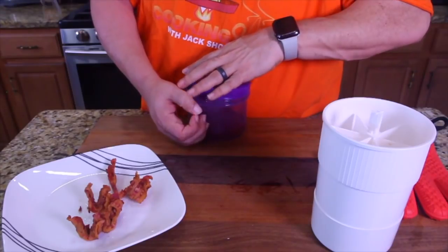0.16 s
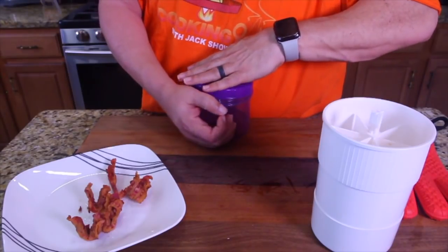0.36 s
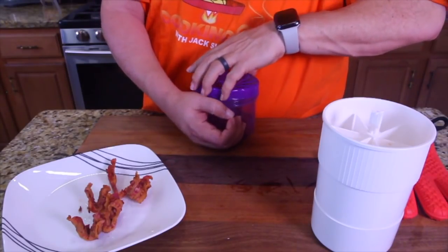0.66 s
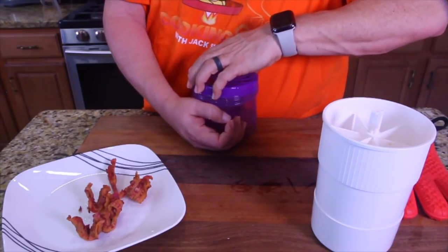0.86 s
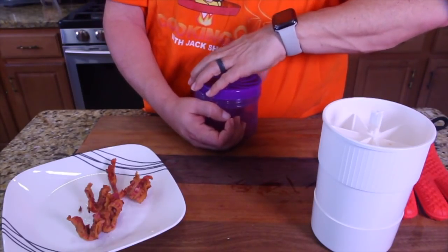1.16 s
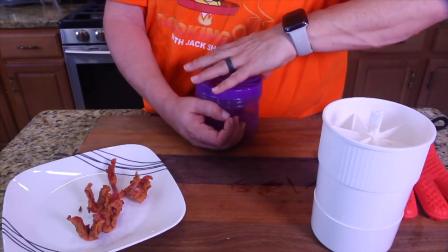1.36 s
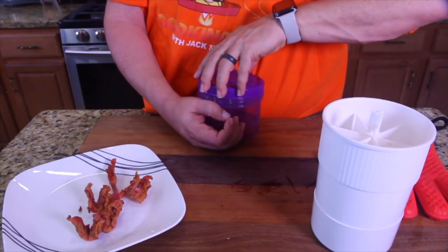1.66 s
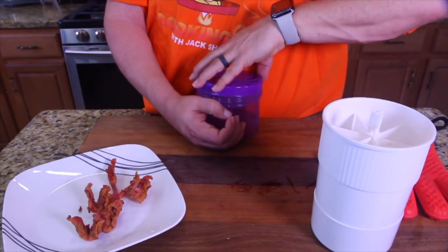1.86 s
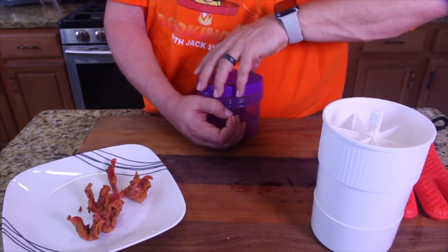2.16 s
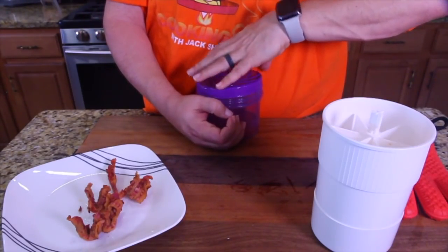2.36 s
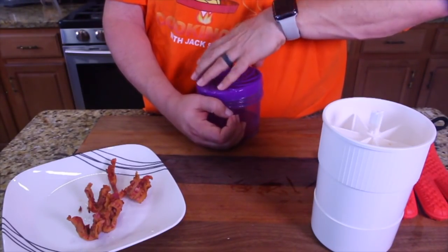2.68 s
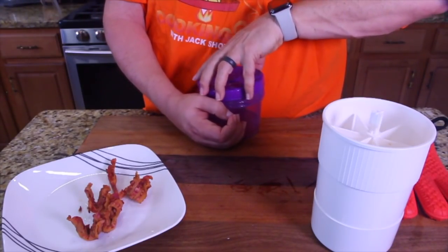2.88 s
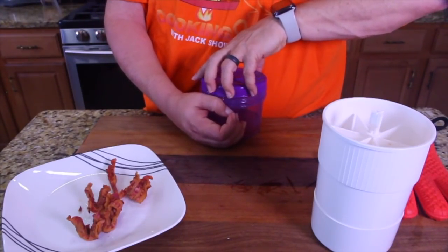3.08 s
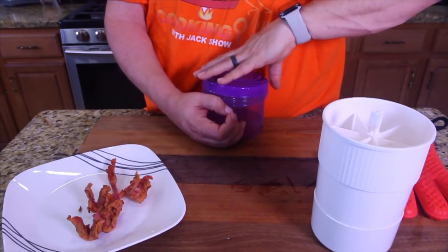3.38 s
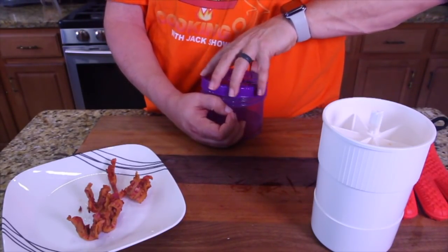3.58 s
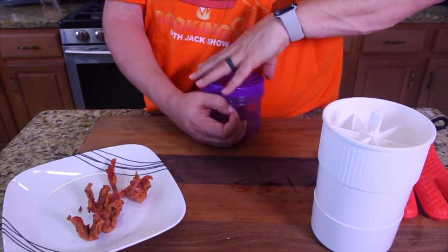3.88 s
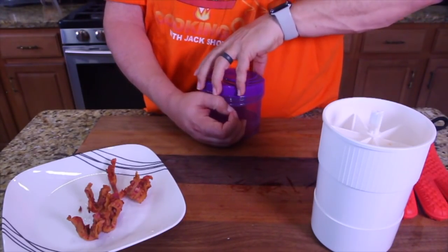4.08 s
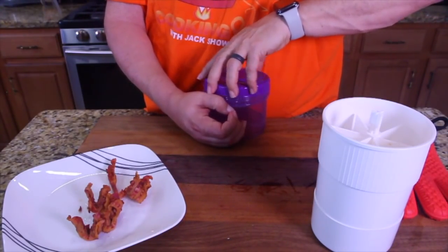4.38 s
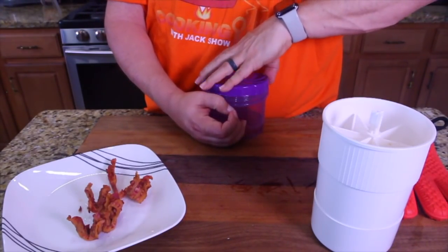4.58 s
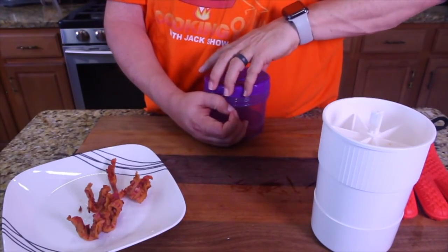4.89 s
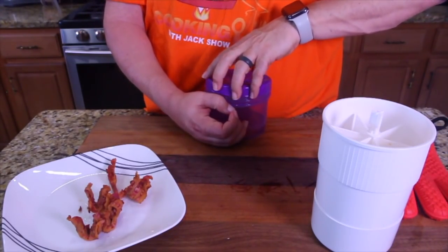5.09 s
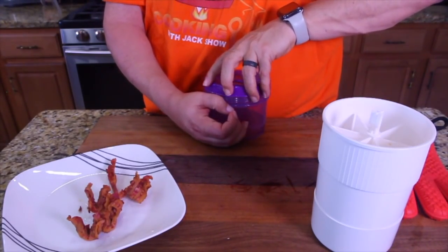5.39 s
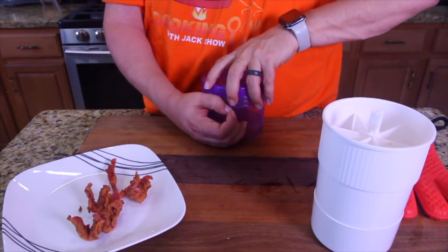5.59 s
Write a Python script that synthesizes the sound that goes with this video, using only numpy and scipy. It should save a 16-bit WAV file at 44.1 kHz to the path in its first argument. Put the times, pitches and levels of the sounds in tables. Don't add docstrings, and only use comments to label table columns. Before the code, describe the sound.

A plastic screw lid is twisted on a small jar over a wooden board, with irregular clicks, hollow knocks, short scrapes and one faint squeak.

```python
import sys
import numpy as np
from scipy import signal
from scipy.fft import rfft, irfft, next_fast_len
from scipy.io import wavfile
from scipy.ndimage import uniform_filter1d

SR = 44100
rng = np.random.default_rng(int(sys.argv[2]) if len(sys.argv) > 2 else 0)


def voltage_ratio(decibels):
    exponent = np.asarray(decibels, float) / 20
    return 10 ** exponent


def unload_wav(signal):
    wavfile.write(
        sys.argv[1],
        SR,
        np.round(np.clip(np.atleast_2d(signal).T, -1, 1) * 32767).astype(np.int16),
    )


N = 253134
ROOM_TO_SPARE = 32768

# frequency in Hz, width in Hz, level in dB.
BOARD = [(137.7, 10.8, 0.5), (194.5, 4.1, 7), (233.6, 7.1, 4), (285.1, 14.2, 2.5), (336.4, 16.7, 1.5),
         (381, 65, -6.5), (508, 33, 6)]
# frequency in Hz, width in Hz, level in dB.
JAR = [(526, 280, -0.5), (741, 118, 6), (774, 44, 5), (960, 133, 3), (1060, 143, 2), (1200, 54, -1),
       (1263, 19, 1), (1630, 99, -4), (1988, 51, -7.5), (2190, 260, -14.5), (2680, 30, -27),
       (3440, 40, -33)]
# start in seconds, time held in seconds, scrape in dB,
# weight on the board in dB over the scrape, skin hiss in dB over the scrape.
TWISTS = [(0.0, 0.022, -43.5, -2, -9.5), (0.202, 0.018, -56, -20, -5), (0.335, 0.03, -51, -12, -4),
          (0.5, 0.12, -58.5, -2, -3), (0.72, 0.19, -62.5, -4, 1), (0.95, 0.0098, -44, -2, -6),
          (1.1, 0.056, -47.5, 6, -3.5), (1.66, 0.043, -49.5, 1.5, -9), (1.82, 0.18, -60.5, 7, -1.5),
          (2.04, 0.027, -78, 5, 3), (2.27, 0.057, -48, -3.5, -10), (2.58, 0.034, -50.5, -0.5, -8.5),
          (2.7, 0.13, -52.5, 2, -4), (3.02, 0.026, -47, 1, -12.5), (3.19, 0.049, -46.5, 3, -9),
          (3.58, 0.088, -73.5, -9, 11.5), (3.66, 0.11, -49.5, 2, -7), (4.2, 0.1, -55, 1.5, -7),
          (4.463, 0.094, -47, -5, -3.5), (4.86, 0.051, -51.5, -8, -11), (5.02, 0.097, -51.5, -5.5, -8.5),
          (5.19, 0.046, -61, 0.5, -8.5), (5.545, 0.02, -63, 5, 1), (5.61, 0.016, -61, -10, -16),
          (5.72, 0.027, -72, 10, 8)]


def unit(x):
    return x / np.sqrt(np.mean(x ** 2) + 1e-20)


def peak(x):
    return x / np.abs(x).max()


def along(points, hz):
    f, v = np.transpose(points)
    return np.interp(np.log(hz + 1), np.log(f + 1), v)


def shade(points):
    return lambda hz: voltage_ratio(along(points, hz))


def filtered(x, response):
    m = next_fast_len(len(x) + 4096)
    spectrum = rfft(x, m) * response(np.fft.rfftfreq(m, 1 / SR))
    return irfft(spectrum, m)[:len(x)]


def lowpass(hz, corner_hz):
    return 1 / (1 + 1j * hz / corner_hz) ** 2


def resonances(modes, hz, change_db=0):
    centre, width, db = np.transpose(modes)[:, :, None]
    sign = (-1.) ** np.arange(len(modes))[:, None]
    gain = voltage_ratio(db + np.reshape(change_db, (-1, 1))) * sign
    return np.sum(gain * 1j * hz * width / (centre * centre - hz * hz + 1j * hz * width), axis=0)


def taps(t, spread_s, count, chatter=1):
    x = np.zeros(len(t))
    when, size = rng.random((2, count))
    x[(spread_s * when * SR).astype(int) + 1] = chatter * (1.87 * size - .3)
    x[0] = 1
    return x


def played(events, sound):
    out = np.zeros(N + ROOM_TO_SPARE)
    for s, *values in events:
        dry, sent = sound(*values)
        wet = echo(sent, gap_s=0.0079)
        out[round(s * SR):][:len(dry)] += dry
        out[round(s * SR):][:len(wet)] += wet
    return out[:N]


def contacts():
    # start in seconds, knock in dB, knock centre in Hz,
    # air in the jar in dB, board in dB.
    hard_knocks = [(0.918, -42, 1080, -34, -60), (0.935, -26, 840, -31, -64), (1.071, -47, 900, -30.5, -33),
                   (1.155, -35, 1090, -29.5, -24), (1.715, -30.5, 1120, -33, -35),
                   (1.962, -31, 690, -41, -32), (2.283, -31.5, 1520, -38, -31),
                   (2.299, -29.5, 590, -34, -28), (2.677, -49, 980, -57, -56),
                   (2.683, -27.5, 2020, -25, -37), (3.037, -40, 810, -53, -46),
                   (3.214, -21.5, 676, -31, -36), (3.717, -32.5, 667, -37, -45),
                   (3.791, -34, 695, -34, -33.5), (4.054, -38, 737, -51.5, -45.5),
                   (4.181, -40.5, 1200, -37, -35), (4.451, -31, 660, -28, -31),
                   (4.454, -30.5, 1010, -30.5, -58), (4.461, -20.5, 1210, -32, -43),
                   (4.773, -26.5, 946, -21.5, -24), (4.968, -34, 1100, -29, -67),
                   (4.997, -30.5, 1040, -34, -41), (5.002, -43, 1200, -40, -72),
                   (5.735, -36, 655, -61, -42)]
    # start in seconds, lid in dB, air in the jar in dB, board in dB.
    finger_landings = [(0.002, -38, -28.5, -31.5), (0.546, -44.5, -35.5, -34), (0.721, -73, -45.5, -43),
                       (1.059, -51, -37, -37.5), (1.116, -56, -57, -31.5), (1.219, -56, -46, -43),
                       (1.585, -59, -46, -38), (1.648, -35, -31, -35), (1.719, -63, -62, -31),
                       (2.179, -56, -41, -31), (2.203, -53, -38, -52), (2.231, -61, -36, -44),
                       (2.506, -54, -37.5, -37.5), (2.822, -58, -52, -41), (2.911, -62, -51, -44),
                       (3.141, -43, -36.5, -52), (3.288, -40.5, -26, -25), (3.66, -50, -45, -65),
                       (3.899, -73, -51, -55), (4.162, -54, -47, -44), (4.237, -50, -36.5, -64),
                       (4.409, -59, -46.5, -43), (5.143, -63, -44, -43.5), (5.414, -61, -50.5, -46.5),
                       (5.565, -53.5, -39.5, -56), (5.715, -48.5, -44.5, -42.5)]
    # start in seconds, knock in dB, knock centre in Hz,
    # air in the jar in dB.
    light_touches = [(0.003, -33.5, 1085, -65), (1.649, -58, 660, -63), (0.149, -40.5, 726, -64),
                     (0.449, -38, 700, -46.5), (0.893, -60, 921, -45), (1.035, -41, 750, -62),
                     (1.101, -37, 1060, -33.5), (1.249, -40, 1050, -43), (1.614, -36, 916, -42),
                     (1.985, -40, 1020, -43), (2.001, -41, 680, -41.5), (2.553, -43, 760, -67),
                     (2.59, -43, 840, -43), (2.986, -43, 1250, -46), (2.998, -42, 955, -61),
                     (3.609, -42, 880, -42.5), (4.953, -40, 826, -37)]
    delay_s = 0.00124
    knocks = [(s, db, hz, db - 21, jar, board) for s, db, hz, jar, board in hard_knocks]
    landings = [(s, lid + 7, 880, lid, jar, board) for s, lid, jar, board in finger_landings]
    touches = [(s, db, hz, db - 29, jar, jar - 2.5) for s, db, hz, jar in light_touches]
    return np.roll(played(knocks + landings + touches, contact), round(delay_s * SR))


def contact(knock_db, knock_hz, lid_db, jar_db, board_db):
    t = np.arange(4096) / SR

    def burst(hz, s):
        return np.sin(2 * np.pi * hz * t) * (t / s) * np.exp(1 - t / s)

    push = -voltage_ratio(jar_db + 4.0) * burst(291.2, 0.0035)
    push -= voltage_ratio(board_db + 3.5) * burst(211.0, 0.0034)
    push -= voltage_ratio(lid_db + 5.5) * burst(481.0, 0.0021)
    ring = voltage_ratio(-5) * filtered(push, lambda hz: resonances(BOARD, hz))
    thump = push + ring + voltage_ratio(board_db - 46) * burst(100, 0.011)

    near_db = -7 * np.log2(np.transpose(JAR)[0] / knock_hz) ** 2

    def wall(hz):
        modes = resonances(JAR, hz, np.maximum(near_db, -14))
        modes = modes + resonances([(knock_hz, 600, -7)], hz) + resonances([(knock_hz, 110, 1.5)], hz)
        return modes * lowpass(hz, 900 + 0.78 * knock_hz)

    knock = voltage_ratio(knock_db - 2.0) * peak(filtered(taps(t, 0.00385, count=2), wall))
    return thump + knock, voltage_ratio(-9) * thump + voltage_ratio(-5) * knock


def clicks():
    # start in seconds, peak in dB, edge accent in Hz,
    # brightness in dB per octave.
    dry_slips = [(0.0024, -42.5, 3990, 6), (0.2925, -70, 3860, -4), (1.0668, -31, 6100, 0),
                 (1.071, -31.5, 4160, 2.5), (1.0768, -30, 6300, 0.5), (1.102, -38, 4380, 7),
                 (1.1566, -28, 3730, -2), (1.249, -37, 3900, -0.5), (1.6492, -44, 3520, 0),
                 (1.7203, -35.5, 3720, -19), (1.9618, -38, 3640, -1), (2.206, -48, 5840, 3),
                 (2.2821, -34, 4200, 0), (2.2998, -31, 4500, 0.5), (3.043, -33, 4050, 0.5),
                 (3.144, -34.5, 4330, 3), (3.2898, -29, 4170, -0.5), (3.789, -38.5, 3920, 0.5),
                 (4.172, -43, 5540, 1), (4.1809, -38.5, 6200, -2), (4.2367, -42.5, 6200, 2.5),
                 (4.456, -15, 5700, 3.5), (4.7742, -30, 4070, 1.5), (4.955, -43, 4130, 0),
                 (4.9686, -41, 3000, -4), (4.977, -35, 4150, 1), (4.9959, -27.5, 3600, -0.5),
                 (5.7354, -43, 3800, 1)]
    # start in seconds, peak in dB, edge accent in Hz,
    # wall accent in Hz, brightness in dB per octave.
    ringing_slips = [(0.918, -29, 4100, 2130, 0), (0.891, -46, 5210, 2300, 1),
                     (0.9366, -29.5, 3970, 2750, 3.5), (1.037, -39, 3700, 2780, -5),
                     (1.1177, -36, 3900, 2570, 6), (1.7156, -31, 6530, 2080, 3),
                     (2.0, -41, 4000, 3320, 0.5), (2.1246, -46, 5640, 2360, 5),
                     (2.507, -46.5, 4200, 2560, 0), (2.5518, -45, 4130, 2440, -6),
                     (2.676, -35, 4650, 2090, -8), (2.6844, -23, 6900, 2300, 3.5),
                     (2.915, -46, 4100, 2350, 1), (2.9968, -41, 3850, 2480, 2.5),
                     (3.609, -47.5, 8300, 2040, 9), (3.717, -32.5, 3900, 2550, 3),
                     (3.926, -51, 5840, 2150, 8), (4.0544, -48.5, 5870, 2070, 1),
                     (5.565, -38.5, 4320, 2190, -1.5)]
    # start in seconds, peak in dB, edge accent in Hz, second accent in Hz,
    # brightness in dB per octave.
    flick = (5.6727, -47, 5820, 7295, 6)
    walls_hz = 2450 + 600 * rng.standard_normal(len(dry_slips))
    slips = [(s, db, hz, wall, 2, tilt) for (s, db, hz, tilt), wall in zip(dry_slips, walls_hz)]
    snaps = [(s, db, hz, wall, 13, tilt) for s, db, hz, wall, tilt in ringing_slips]
    nail = [(*flick[:-1], 22, flick[-1])]
    return played(slips + snaps + nail, click)


def click(db, edge_hz, wall_hz, accent_db, tilt_db):
    # frequency in Hz, level in dB.
    click_colour = [(1200, 9.5), (2300, 3.5), (4000, -2), (5200, -5.5), (6200, -3.5), (9000, -5.5),
                    (11500, -10), (14000, -20.5), (16000, -23.5)]
    t = np.arange(2048) / SR

    def colour(hz):
        return shade(click_colour)(hz) * voltage_ratio(tilt_db * np.log2(np.maximum(hz, 2000) / 5000))

    def edge(hz):
        lid_edge = resonances([(edge_hz, 450, accent_db)], hz)
        wall = resonances([(wall_hz, 300, accent_db - 9.5)], hz)
        return colour(hz) * (1.5 + lid_edge + wall)

    fray = 0.11 * rng.standard_normal(len(t)) * voltage_ratio(-60 * t / 0.043)
    catch = taps(t, 0.0016, count=3, chatter=0.26) + fray
    crack = -voltage_ratio(db + 6.5) * peak(filtered(np.roll(catch, 8), edge))
    pulse = np.roll(taps(t, .003, count=0), 64)
    smooth = filtered(pulse, lambda hz: abs(edge(hz)) ** 0.48 * colour(hz) ** 0.31)
    return crack, voltage_ratio(-2.5) * smooth * np.linalg.norm(crack) / np.linalg.norm(smooth)


def thread():
    # frequency in Hz, level in dB.
    skin = [(1500, -0.5), (2400, -0.5), (3200, -1), (4400, -4), (5100, -5), (5900, -1.5), (7500, -5.5),
            (11000, -14), (16000, -21)]
    scrape_db, weight_db, skin_db = np.transpose(TWISTS)[2:]
    rumble_gain = effort(scrape_db + weight_db, ease_db_per_s=82, rest_db=-68)
    scrape_gain = effort(scrape_db, ease_db_per_s=57.5, rest_db=-89)
    hiss_gain = effort(scrape_db + skin_db, ease_db_per_s=60.5, rest_db=-69)

    wide_jar = np.array(JAR) * np.array([1, 1.6, 1])
    rumble = filtered(grit(70, spread_db=4, smooth=.4), lambda hz: resonances(BOARD[:-1], hz))
    scrape = filtered(grit(250, spread_db=1.5, smooth=0.77), lambda hz: resonances(wide_jar, hz))
    hiss = filtered(grit(700, spread_db=2.0, smooth=2.2), shade(skin))

    rub = voltage_ratio(1.0) * rumble_gain * unit(rumble)
    rub += voltage_ratio(-5.0) * scrape_gain * unit(scrape)
    return rub + voltage_ratio(-3.5) * hiss_gain * unit(hiss)


def effort(layer_db, ease_db_per_s, rest_db):
    start, held = np.transpose(TWISTS)[:2, :, None]
    t = np.arange(0, N + 64, 64) / SR
    setting_in = 179 * np.maximum(start - t, 0)
    easing_off = ease_db_per_s * np.maximum(t - start - held, 0)
    db = layer_db[:, None] - setting_in - easing_off
    gain = np.sqrt(np.sum(voltage_ratio(2 * db), axis=0) + voltage_ratio(2 * rest_db))
    return np.interp(np.arange(N) / SR, t, gain)


def grit(rate, spread_db, smooth):
    draw = rng.random((3, N))
    size = voltage_ratio(-spread_db * np.log(draw[2] + 1 / 20))
    slips = (draw[0] < rate / SR) * np.sign(draw[1] - .5) * size
    return unit(slips) + smooth * rng.standard_normal(N)


def rings():
    # frequency in Hz, level in dB, t60 in seconds.
    bell = [(556, 4, 0.25), (1040, -9, 0.11), (1197, 5, 0.18), (1310, -3, 0.22), (1680, -8, 0.25),
            (1880, -2.5, 0.32), (1980, -5, 0.28), (2643, -1, 0.24), (3140, -3, 0.25), (3530, -22, .22),
            (3840, -16, .26)]
    # start in seconds, level in dB, centre of the ringing in Hz.
    blows = [(0.934, -48, 1920), (1.073, -55, 1910), (1.118, -49, 2300), (1.156, -49, 1500),
             (1.651, -55, 800), (1.716, -51.5, 1900), (2.283, -52, 1500), (2.684, -43.5, 1900),
             (3.215, -50, 1200), (3.717, -58, 1250), (4.183, -52, 1240), (4.458, -42.5, 1690),
             (4.776, -50.5, 1610), (4.999, -45, 1200)]
    out, t = np.zeros(N + ROOM_TO_SPARE), np.arange(8192) / SR
    hz, level, t60 = np.transpose(bell)[:, :, None]
    for s, db, centre_hz in blows:
        flutter = uniform_filter1d(rng.standard_normal((len(bell), len(t))), size=900, axis=1)
        focus_db = -14 * np.log2(hz / centre_hz) ** 2
        gain = voltage_ratio(db + level + focus_db - 60 * t / t60 + 3.9 * unit(flutter))
        phase = 2 * np.pi * (hz * t + rng.random(hz.shape))
        swell = 1 - np.exp(-t / 0.002)
        out[round(s * SR):][:len(t)] += np.sum(gain * np.sin(phase), axis=0) * swell
    return out[:N]


def rocks_and_pings():
    # start in seconds, frequency in Hz, peak in dB, t60 in seconds.
    dull_rocks = [(0.209, 336, -50, 0.24), (0.312, 323, -49, 0.086), (0.78, 317, -46, 0.1),
                  (0.857, 320, -53, 0.095), (0.904, 295, -37, 0.045), (0.944, 285, -31, 0.12),
                  (1.0, 302, -46, 0.073), (1.166, 190, -43, 0.24), (3.295, 194.5, -55, .3),
                  (4.47, 196, -39, .3), (4.301, 303, -45, 0.067), (3.059, 250, -45, .05),
                  (2.944, 250, -47, .05), (1.117, 287, -30, 0.069), (1.6491, 665, -22.5, 0.022),
                  (1.65, 268, -26, .035), (1.668, 487, -34, 0.053), (2.2905, 635, -36, .02),
                  (2.686, 544, -35.5, 0.054), (4.456, 780, -27, .04), (1.7208, 293, -30.5, 0.12),
                  (1.745, 314, -39, 0.17), (1.877, 318, -49, 0.1), (2.247, 270, -29, .035),
                  (2.304, 551, -39.5, 0.18), (2.305, 280, -27, 0.036), (2.358, 226, -50, .1),
                  (2.5, 252, -45, .03), (2.599, 242, -38, 0.063), (2.721, 318, -46, 0.074),
                  (2.84, 308, -38.5, 0.044), (2.983, 310, -44, 0.068), (3.275, 230, -30, 0.048),
                  (3.354, 230, -32, 0.066), (3.721, 295, -30.5, 0.18), (3.85, 302, -48, 0.079),
                  (4.367, 300, -60, .06), (4.49, 333, -30.5, 0.12), (4.555, 327, -32, 0.047),
                  (4.7715, 300, -29, 0.022), (4.836, 308, -32.5, 0.12), (4.863, 260, -44, 0.043),
                  (5.03, 317, -43, .2), (5.305, 310, -51, .06), (5.439, 243, -49, 0.059),
                  (5.567, 630, -46, 0.057), (5.582, 330, -62, .05), (5.606, 324, -43.5, 0.27)]
    edge_pings = [(0.003, 1060, -38, 0.057), (0.546, 1200, -44.5, 0.035), (0.918, 4000, -49, 0.014),
                  (0.9344, 2670, -44, 0.0092), (0.937, 1050, -38, 0.034), (1.036, 720, -35, .03),
                  (1.07, 875, -30, 0.018), (1.077, 3270, -40, 0.025), (1.118, 2520, -33.5, 0.019),
                  (1.16, 1290, -35, .04), (1.249, 3900, -48, .015), (1.614, 960, -41, .025),
                  (1.648, 860, -35, 0.012), (1.649, 1220, -34, .015), (1.714, 1087, -38, 0.034),
                  (2.283, 1500, -57, 0.028), (2.684, 754, -21, 0.011), (2.684, 4260, -34.5, .015),
                  (0.003, 297, -40, 0.039), (2.685, 2770, -44, 0.016), (2.996, 1000, -38, 0.02),
                  (3.143, 980, -36, .025), (3.214, 1200, -33.5, 0.022), (3.213, 2070, -41, 0.018),
                  (3.234, 1830, -43, .025), (3.145, 1830, -48, 0.077), (2.291, 1260, -36, 0.014),
                  (2.2765, 900, -37, 0.025), (2.2, 1900, -54, 0.01), (0.548, 1640, -56.5, 0.17),
                  (3.717, 4000, -52, .02), (3.718, 2530, -43, .02), (3.788, 1000, -43, .025),
                  (4.056, 1120, -61, 0.015), (4.181, 1200, -49, 0.031), (4.457, 1990, -32, 0.033),
                  (4.457, 5930, -28, .008), (4.461, 2560, -30, .008), (4.462, 1390, -31, 0.013),
                  (4.969, 1020, -47, .03), (4.774, 996, -31, .03), (4.79, 1214, -44, 0.099),
                  (4.82, 1770, -50.5, 0.091), (4.97, 640, -37, 0.037), (4.998, 875, -33, 0.055),
                  (4.057, 750, -44, 0.023), (4.181, 970, -40, 0.033), (4.997, 1233, -41, 0.073)]
    catch_crack = [
        (2.6845, 9600, -23, .004),
        (2.6845, 7600, -23, .004),
        (2.6846, 6200, -25, .004),
    ]
    out, t = np.zeros(N + ROOM_TO_SPARE), np.arange(8192) / SR
    for s, hz, db, t60 in [*dull_rocks, *edge_pings, *catch_crack]:
        rise = 1 - np.exp(-t * hz / 0.66)
        out[round(s * SR):][:len(t)] += voltage_ratio(db - 60 * t / t60) * rise * np.sin(2 * np.pi * hz * t)
    return out[:N]


def rim_slides():
    # frequency in Hz, width in Hz, level in dB.
    rim = [(872, 60, -9), (1270, 110, -1), (1450, 45, -5), (1650, 110, -8), (2870, 60, -22),
           (3280, 220, -13), (4690, 120, -14), (6000, 200, -19), (8400, 250, -19)]
    # start in seconds, swell in seconds, time held in seconds, level in dB.
    strokes = [
        (0.12, 0.097, 0.11, -63),
        (0.33, .02, 0.13, -73),
        (0.57, 0.023, 0.11, -64),
        (3.51, 0.024, 0.057, -78),
        (3.58, 0.053, .13, -58.5),
    ]
    return friction(strokes, rim)


def nail_drags():
    # frequency in Hz, width in Hz, level in dB.
    lid_edge = [(5700, 700, 13), (7300, 600, -18)]
    # start in seconds, swell in seconds, time held in seconds, level in dB.
    strokes = [
        (0.05, .06, .1, -68),
        (0.32, 0.017, .05, -74),
        (5.668, 0.0051, 0.031, -63.5),
    ]
    return friction(strokes, lid_edge)


def friction(strokes, modes):
    t = np.arange(N) / SR
    gain = np.zeros(N)
    for s, swell, held, db in strokes:
        corners = np.cumsum([s, swell, held, 0.059])
        gain += voltage_ratio(db) * np.interp(t, corners, [0, 1, 1, 0])
    return gain * unit(filtered(rng.standard_normal(N), lambda hz: resonances(modes, hz)))


def squeak():
    # time in seconds, pitch in Hz, level in dB.
    path = [
        (3.5, 1200, -84),
        (3.536, 1255, -66),
        (3.6, 1270, -70),
        (3.66, 1215, -53),
        (3.7, 1270, -56),
        (3.73, 1300, -52),
        (3.77, 1260, -61),
        (3.8, 1240, -76),
    ]
    # ratio to the pitch, level in dB, dB lost per 4 dB of lighter grip.
    lines = [(1, -1.5, -1), (1.321, -20, 2), (2.6, -9, 2), (3.749, -19, 11)]
    s, hz, db = np.transpose(path)
    t = np.arange(N) / SR
    pitch = np.interp(t, s, hz)
    level = np.interp(t, s, db, left=-150, right=-150)
    out = np.zeros(N)
    for ratio, mode_db, steep in lines:
        noises = rng.standard_normal((2, N))
        waver, flutter = (unit(uniform_filter1d(uniform_filter1d(v, size=200), size=200)) for v in noises)
        phase = 2 * np.pi * np.cumsum(ratio * pitch * (1 + .035 * waver)) / SR
        lighter_db = .25 * steep * (level - db.max())
        out += voltage_ratio(level + mode_db + lighter_db + 3.5 * flutter) * np.sin(phase)
    return out


def echo(x, gap_s):
    # frequency in Hz, t60 in seconds.
    kitchen = [(100, 0.038), (300, 0.54), (1000, 0.42), (4000, 0.51), (9000, 0.32), (14000, 0.19)]
    hz, t, z = signal.stft(rng.standard_normal(SR // 3), SR, nperseg=256)
    uneven = uniform_filter1d(rng.standard_normal(z.shape), size=2, axis=0)
    z *= voltage_ratio(2.6 * uniform_filter1d(uneven, size=4, axis=1))
    decay = voltage_ratio(-60 * t / along(kitchen, hz)[:, None])
    tail = signal.istft(z * decay, SR, nperseg=256)[1]
    since = np.arange(len(tail)) / SR
    tail *= 1 - np.exp(-since / gap_s)
    tail *= 1 + 1.12 * np.exp(-since / 0.012)
    return signal.fftconvolve(x, tail / np.linalg.norm(tail))


def air():
    # frequency in Hz, level in dB per Hz.
    hum_and_hiss = [(12, 5), (20, -3), (104, 1), (130, -7.5), (446, -3), (607, -25), (660, -18), (738, -17),
                    (1440, -11.5), (1570, -28), (1860, -22.5), (9950, -20), (16000, -26.5)]
    return voltage_ratio(-64) * unit(filtered(rng.standard_normal(N), shade(hum_and_hiss)))


def scene():
    # frequency in Hz, level in dB per Hz.
    apart_colour = [(12, -28), (20, -9), (780, -16.5), (1150, -19), (1480, -23), (2140, -15.5), (4060, -24),
                    (16000, -15)]
    hands = thread() + contacts() + clicks()
    mono = filtered(hands, lambda hz: (1j * hz / 95) ** 2 * lowpass(hz, 91.9))
    mono = mono + air() + rings() + rocks_and_pings() + rim_slides() + nail_drags() + squeak()
    level = np.sqrt(abs(uniform_filter1d(mono ** 2, 2048)))
    trace = unit(filtered(rng.standard_normal(N), shade(apart_colour)))
    apart = (voltage_ratio(-84) + voltage_ratio(-57.0) * level) * trace
    return np.array([mono + apart, mono - apart])


def band_limit(x):
    return signal.sosfilt(signal.butter(12, 16490, fs=SR, output="sos"), x)


def record(dry):
    held = dry / (1 + np.abs(dry / .21) ** 4) ** (1 / 4)
    top_cut = lambda hz: np.where(hz < 15830, 1, voltage_ratio(-30))
    mix = np.array([filtered(channel, top_cut) for channel in held])
    return band_limit(mix)


dry = scene()
out = record(dry)
unload_wav(out)
```